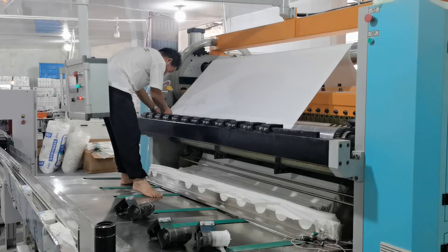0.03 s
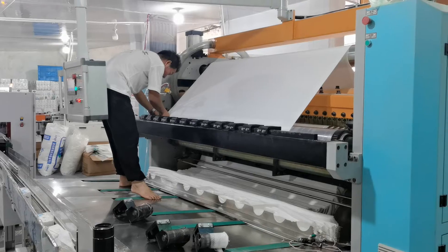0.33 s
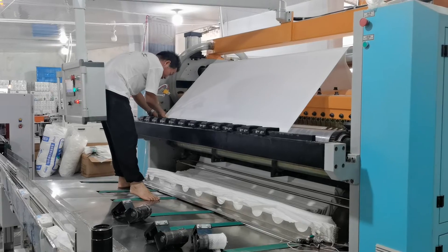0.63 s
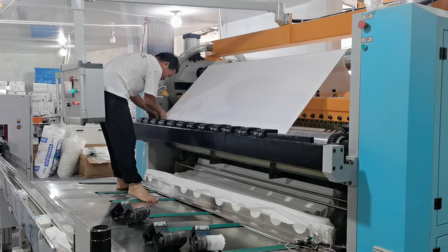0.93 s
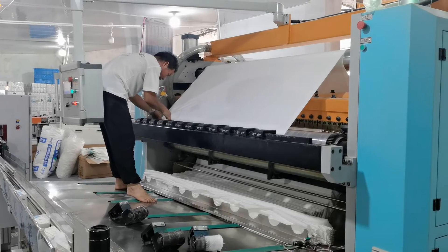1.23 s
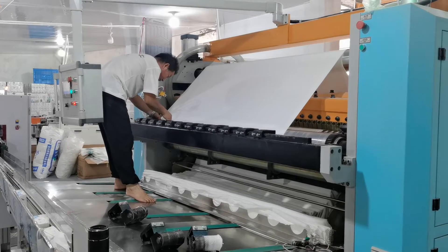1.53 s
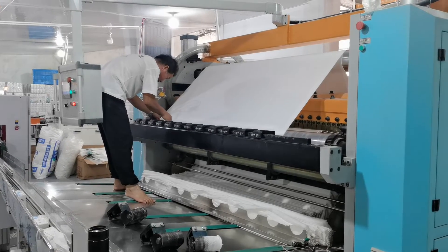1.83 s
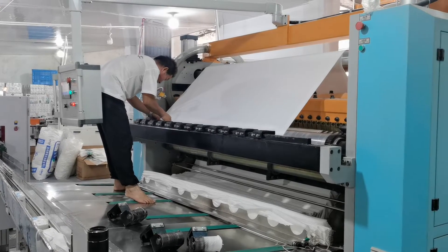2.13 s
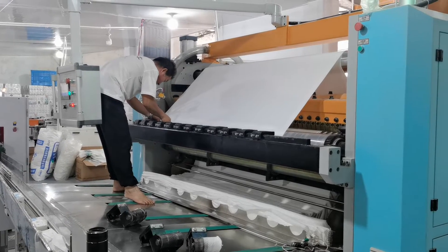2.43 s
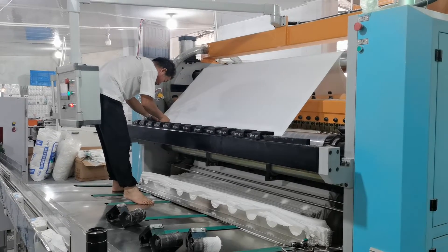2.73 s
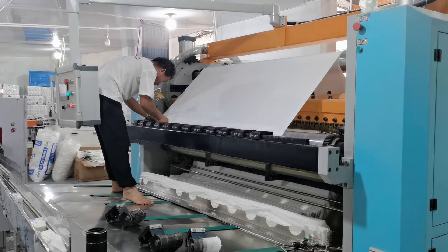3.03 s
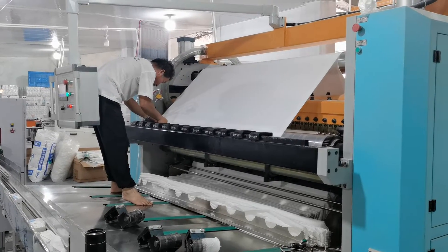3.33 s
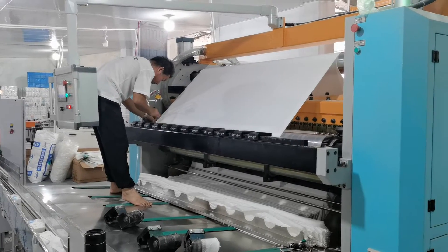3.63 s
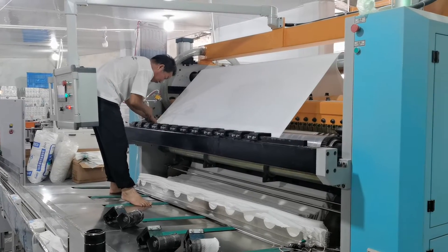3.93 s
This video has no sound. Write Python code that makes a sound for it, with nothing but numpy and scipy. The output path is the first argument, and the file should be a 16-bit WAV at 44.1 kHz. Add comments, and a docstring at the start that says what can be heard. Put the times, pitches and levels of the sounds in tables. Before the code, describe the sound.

A paper folding machine cuts in loudly at about 0.4 seconds, its rollers rumbling and roaring with ringing steel, a humming drive, sliding paper and hissing air. Around 1.1 seconds the level drops, then holds steady until 4 seconds. A short swish passes at 1.4, a soft hollow swell at 2.5, and faint rasps near 3.1 and 3.9. The machine sits right; the left carries only faint rumble.

```python
"""A factory hall with a tissue folding machine running steadily. Rollers rumble and roar and keep the
steel frame ringing; the drive hums and whines, paper slides, suction air hisses. A short swish, a soft
hollow swell and a few rasps pass. The sound cuts in loud and drops to a lower level about a second in.
It sits in the right ear, with only a faint rumble in the left."""
import sys
import numpy as np
from scipy import signal
from scipy.fft import rfft, irfft, next_fast_len
from scipy.io import wavfile
from scipy.ndimage import uniform_filter1d, map_coordinates

SR = 44100
rng = np.random.default_rng(int(sys.argv[2]) if len(sys.argv) > 2 else 0)


def transcribe(signal):
    """Save signal, clipped to [-1, 1], as a 16-bit WAV file at the path in sys.argv[1]."""
    frames = np.atleast_2d(signal).T
    limited = np.clip(frames, -1, 1)
    pcm = np.round(limited * 32767).astype(np.int16)
    wavfile.write(sys.argv[1], SR, pcm)


N = 176400
T = np.arange(N) / SR


def amp(db):
    """Decibels to gain."""
    return 10 ** (np.asarray(db) / 20)


def unit(x):
    """Scale to rms 1."""
    return x / np.sqrt(np.mean(x ** 2) + 1e-20)


def curve(rows):
    """Rows of (seconds, value) to one value per sample."""
    return np.interp(T, *np.transpose(rows))


def wobble(rate_hz):
    """Smooth random curve, rate_hz knots a second."""
    return map_coordinates(rng.standard_normal(1024), [T * rate_hz], mode="wrap")


def filtered(x, response):
    """FFT filter; response maps Hz to gain."""
    size = next_fast_len(N + SR // 2)
    return irfft(rfft(x, size) * response(np.fft.rfftfreq(size, 1 / SR)), size)[:N]


def rush(spectrum, patchy_db):
    """Coloured noise, rms 1, with random gain patches in time and frequency."""
    bins = signal.stft(rng.standard_normal(N), nperseg=512)[2]
    patches = uniform_filter1d(rng.standard_normal(bins.shape), size=5, axis=0)
    patches = unit(uniform_filter1d(patches, size=16, axis=1))
    noise = signal.istft(bins * amp(patchy_db * patches), nperseg=512)[1][:N]
    hz, db = np.transpose(spectrum)
    return unit(filtered(noise, lambda f: amp(np.interp(np.log(f + 1), np.log(hz), db))))


def ringing(hz, width_hz):
    """Noise-driven resonance, rms 1; response squared for steep skirts."""
    noise = rng.standard_normal(N)
    return unit(filtered(noise, lambda f: (1j * f * width_hz / (hz * hz - f * f + 1j * f * width_hz)) ** 2))


def faint_rumble(level_db=-62):
    """Quiet, dull noise, strongest near 70 Hz."""
    # Rumble spectrum. Each row: frequency in Hz, relative density in dB.
    spectrum = [(15, -14), (35, -8), (70, 2), (130, -4.5), (220, -7.5), (300, -13), (550, -16),
                (1200, -22.5), (2500, -27.5), (4300, -29), (5000, -37.5), (10000, -41), (15000, -36)]
    return amp(level_db) * rush(spectrum, patchy_db=1.5)


def suction_air(level_db=-41):
    """Smooth, high hiss of the suction air."""
    # Hiss spectrum. Each row: frequency in Hz, relative density in dB.
    spectrum = [(2000, -45), (4500, -5), (5800, -21.5), (6500, -16), (7500, -14), (8500, -14), (9300, -5.5),
                (10200, 0.5), (11200, -3.5), (12500, -8.5), (14000, -16), (15700, -24)]
    return amp(level_db) * rush(spectrum, patchy_db=0.9)


def paper_web(level_db=-43.5):
    """The web rustles as it slides evenly over the rollers."""
    # Rustle spectrum. Each row: frequency in Hz, relative density in dB.
    spectrum = [(1500, -29), (2800, 1.5), (3200, 0), (3800, -1), (4350, 0.5), (5000, -4), (5350, -12),
                (5800, -39), (8000, -58)]
    return amp(level_db) * rush(spectrum, patchy_db=1.36)


def swells():
    """Noise bands that rise and fall: a swish, a hollow swell, brief rasps."""
    # Passing noises. Each row: peak time and length in seconds, peak level in dB, centre and width in Hz.
    bands = [(1.382, 0.071, -38.5, 3120, 1490), (1.385, 0.051, -41, 4880, 350),
             (2.493, 0.15, -42.5, 498, 200), (3.07, 0.22, -42.5, 2170, 300), (3.85, 0.16, -41, 2000, 400)]
    return sum(amp(db) * np.exp(-2 * ((T - peak_s) / length_s) ** 2) * ringing(hz, width_hz)
               for peak_s, length_s, db, hz, width_hz in bands)


def drive(shaft_hz=80.4, wander=0.0052):
    """Hum of a slightly unsteady shaft, plus thin gear whines at fixed pitches."""
    # Drive hum. Each row: multiple of the shaft rate, level in dB.
    harmonics = [(1, -55), (2, -56), (3, -63.5), (5, -61)]
    # Whines of the running gear. Each row: frequency in Hz, level in dB.
    whines = [(3463, -60), (7725, -70)]
    shaft_rad = 2 * np.pi * shaft_hz * np.cumsum(1 + wander * wobble(9)) / SR
    hum = sum(amp(db + 3.4 * wobble(6.26)) * np.sin(k * shaft_rad + rng.uniform(0, 2 * np.pi))
              for k, db in harmonics)
    return np.sqrt(2) * hum + sum(amp(db) * ringing(hz, width_hz=18) for hz, db in whines)


def steel_frame():
    """The running parts keep frame and rollers ringing."""
    # Resonances. Each row: frequency in Hz, width in Hz, level in dB.
    modes = [(485.5, 14.4, -53.5), (722.6, 25, -55), (823, 11, -54), (900, 12, -47), (978, 16.3, -47),
             (1026.5, 24, -53), (1060.2, 26, -48.5), (1158, 14.7, -50), (1308, 23, -50), (1519, 14, -51.5),
             (1783, 26, -48), (2018, 23, -52.5), (2127, 7.6, -49), (2385, 24, -50), (4165, 21, -56)]
    return sum(amp(db) * ringing(hz, width_hz) for hz, width_hz, db in modes)


def rollers(rumble_db=-41, roar_db=-35):
    """Low rumble of the rollers, and their roar with the frame ringing in it."""
    # Roller noise spectra. Each row: frequency in Hz, relative density in dB.
    rumble_spectrum = [(15, -44), (28, -18), (40, 0.5), (52, -8.5), (75, 1.5), (100, -2), (125, -4),
                       (155, 2), (230, -0.5), (330, 0), (470, -2), (570, -10), (900, -3), (2000, -48)]
    roar_spectrum = [(300, -28), (620, -8), (740, -3), (860, -3), (960, 4.5), (1080, 1), (1230, -3.5),
                     (1400, -1), (1600, -4), (1820, 1), (2110, 1), (2210, -4.5), (2350, 1), (2580, -7.5),
                     (2900, -6), (3150, -15.5), (4350, -16.5), (5000, -26), (5900, -55)]
    # Extra gain on roar and frame. Each row: time in seconds, gain in dB.
    midrange_gain = [(.35, 2.5), (.7, 3), (1.07, 4), (1.25, 2.5), (1.36, 3), (1.55, 1.6), (1.9, 0),
                     (2.7, -0.06), (3.1, -0.25), (3.6, -.2), (4, 0)]
    frame = steel_frame()
    roar = amp(roar_db + 0.13 * wobble(14)) * rush(roar_spectrum, patchy_db=-0.03)
    rumble = amp(rumble_db) * rush(rumble_spectrum, patchy_db=0.55)
    return rumble + amp(curve(midrange_gain)) * (roar + frame)


def scene():
    """A faint rumble on the left, the machine on the right."""
    left = faint_rumble()
    right = rollers() + drive() + paper_web() + suction_air() + swells()
    return np.array([left, right])


def record(dry, start_s=0.3524, fade_db=6, fade_s=0.025, left_share=0.58, top_hz=15750):
    """Silence, a sudden loud start, then a level drop (smaller on the left); low-pass at top_hz."""
    # Overall gain. Each row: time in seconds, gain in dB.
    overall_gain = [(.35, 10), (.8, 10), (1.08, 9), (1.14, 5), (1.2, 0.1), (1.6, -0.34), (4, -0.5)]
    onset_dip_db = fade_db * np.exp(-np.maximum(T - start_s, 0) / fade_s)
    gain_db = curve(overall_gain) * np.array([[left_share], [1]]) - onset_dip_db
    gated = dry * amp(gain_db) * (T >= start_s)
    return np.array([filtered(channel, lambda hz: hz < top_hz) for channel in gated])


dry = scene()
out = record(dry)
transcribe(out)
```